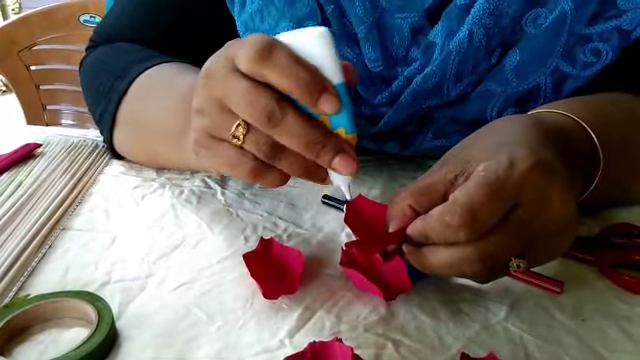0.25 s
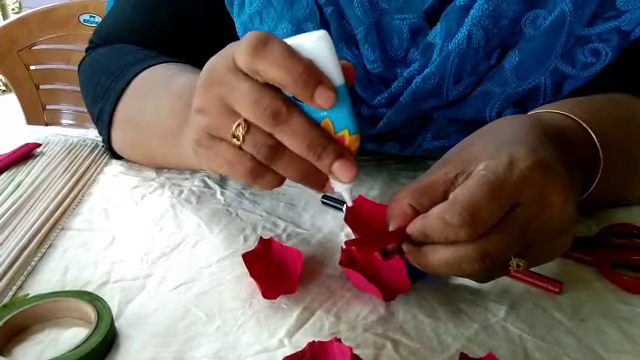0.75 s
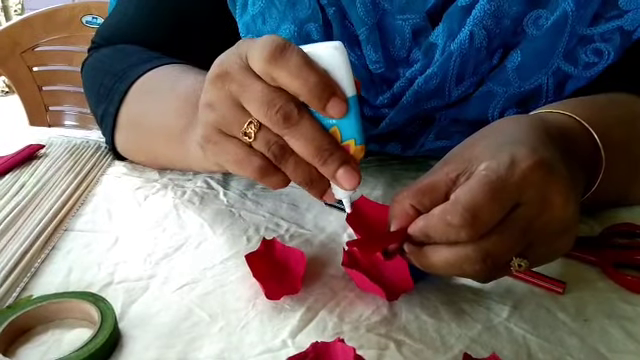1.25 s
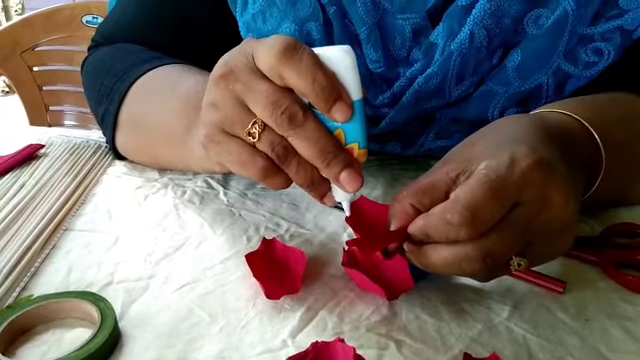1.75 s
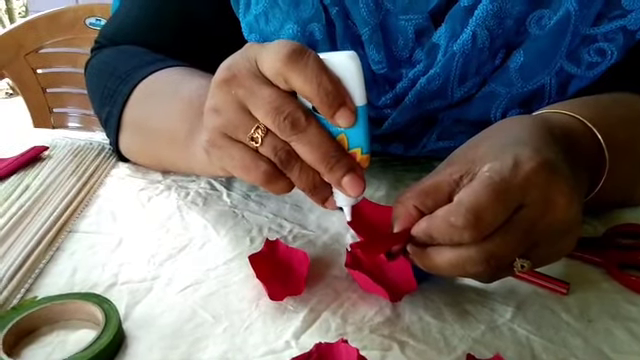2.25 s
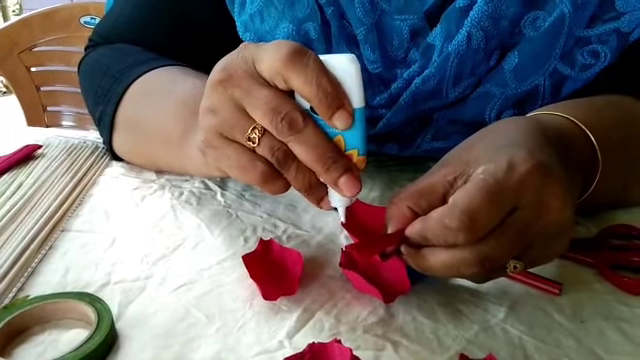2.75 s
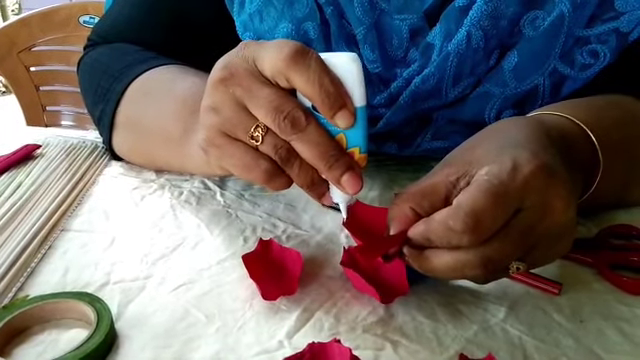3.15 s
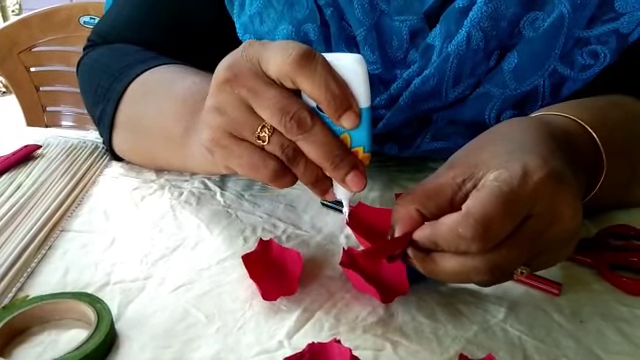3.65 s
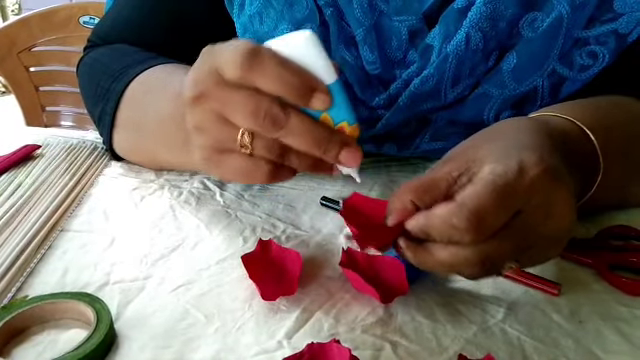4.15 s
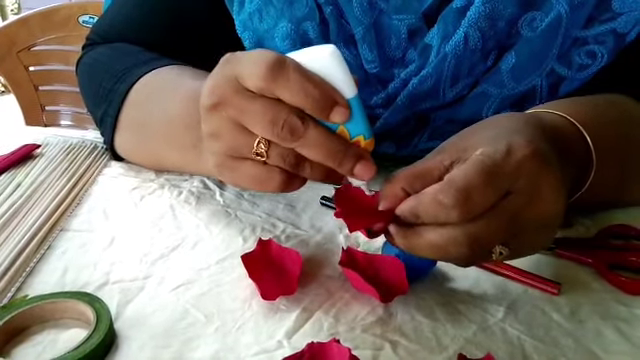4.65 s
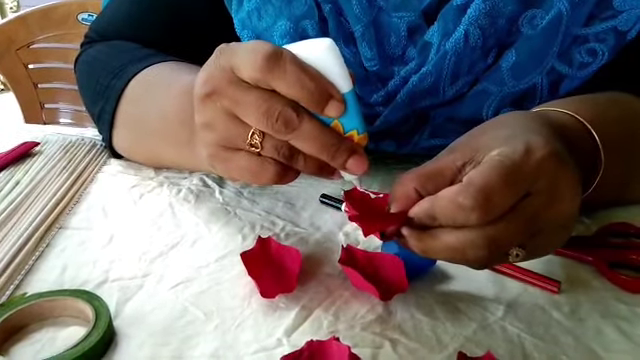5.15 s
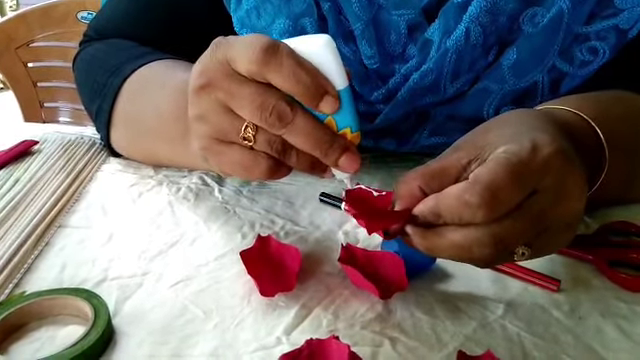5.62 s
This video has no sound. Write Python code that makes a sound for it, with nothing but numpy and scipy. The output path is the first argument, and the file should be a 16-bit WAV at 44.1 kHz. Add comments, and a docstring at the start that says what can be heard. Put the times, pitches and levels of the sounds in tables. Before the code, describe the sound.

Close, dry snaps of a squeeze bottle and petals at a table stand out over a constant motor hum and trilling crickets. Strong clicks come early, with a soft papery hiss, then isolated ones near 1.6 and 2.3 seconds. Distant engines rumble faintly, a weak squeal appears after three seconds, and the microphone carries a fine electrical buzz and high whine.

```python
"""A fan's mains hum and crickets outside sound throughout, over far traffic, from a quiet room.
Close by, at a table, a plastic glue bottle and paper petals click in the hands; one petal rustles.
Far off, faint tones and a squeal come and go; the camera adds a thin buzz of ticks and a high whine.
Hum, whine and chirps are summed sines; air, rumble and rustle are shaped noise; snaps and ticks are
short bursts sent through clicks of a given spectrum. All of it meets at one microphone."""
import sys
import numpy as np
from scipy import signal
from scipy.fft import rfft, irfft
from scipy.io import wavfile

SR = 44100
rng = np.random.default_rng(int(sys.argv[2]) if len(sys.argv) > 2 else 0)


def wav_record(signal):
    """Record a signal, one row per channel, as 16-bit PCM in the file named by sys.argv[1]."""
    frames = np.transpose(np.atleast_2d(signal))
    bounded = np.clip(frames, -1, 1)
    # unit amplitude maps onto the largest positive 16-bit level
    quanta = np.round(bounded * 32767).astype(np.int16)
    wavfile.write(sys.argv[1], SR, quanta)


N = 259308
TIME = np.arange(N) / SR

# Still air of the room: (frequency [Hz], density [dB per Hz])
AIR_SPECTRUM = [(20, -99), (90, -82), (520, -80), (610, -84), (1050, -85.5), (1500, -91), (2100, -97.5),
                (2900, -95.5), (4400, -105), (9100, -100.5), (10400, -88.5), (11400, -100), (12400, -109),
                (15500, -115)]

# Fan motor lines: (multiple of the mains [1], level [dB rms])
FAN_LINES = [(1, -62.5), (3, -46.5), (3.5, -62), (4, -55), (4.5, -53.5), (5, -59), (5.5, -79), (6, -72),
             (7, -65), (7.5, -65.5), (8, -50), (9, -57.5), (10, -54.5), (11, -54), (13, -60), (14, -68),
             (15, -63), (16, -67.5), (17, -59.5), (18, -57), (19, -58), (21, -66.5), (36, -77), (40, -79)]
MAINS_HZ = 49.864

# Far traffic, colour of the rumble: (frequency [Hz], relative density [dB per Hz])
RUMBLE_SPECTRUM = [(15, -42), (26, -22), (33, -8.5), (52, -2.5), (66, -0.5), (85, -14.5), (130, -17.5),
                   (300, -80)]
# One far engine passes at a steady pitch: level when nearest, time when nearest, how long it stays near
PASS_HZ, PASS_DB, NEAREST_S, NEAR_S = 53, -50.5, 2.54, 0.61
# Another pulls away: it comes in, gathers speed and throbs slowly
PULL_START_S, PULL_DB, PULL_FROM_HZ, PULL_TO_HZ, SPEED_UP_S, FADE_IN_S = 1.6, -53, 59, 69.4, .9, .25
THROB_S, THROB_PEAK_S, THROB_DEPTH = 0.95, 2.78, 0.4

# Nearest cricket, phrases: (start [s], first pitch [Hz], relative level [dB], chirps [count])
NEAR_PHRASES = [(-.14, 2782, -51.5, 3), (.36, 2790, -54.5, 3), (.87, 2792, -53.5, 3),
                (1.37, 2795, -52.5, 3), (1.86, 2798, -50.5, 2), (2.28, 2803, -52, 2),
                (2.74, 2806, -51.5, 3), (3.27, 2798, -51, 3), (3.8, 2799, -53.5, 3), (4.29, 2796, -54.5, 3),
                (4.81, 2794, -53, 3), (5.32, 2796, -56.5, 3), (5.8, 2801, -56.5, 3)]
# Its wing tone, harmonics 1-5: (level [dB])
NEAR_WING_DB = [-8.5, -19, -18, -0.35, -39]
# Within a phrase each chirp is lower than the one before, later ones are longer, and the first is soft
STEP_HZ, FIRST_S, LONGER_S, REST_S, FIRST_DB = 25.75, .125, .03, .015, -2

# Farther crickets: (pitch [Hz], relative level [dB])
FAR_CRICKETS = [(2575, -66), (2605, -61), (2625, -58.5), (2640, -57.5), (2655, -58), (2672, -58),
                (2690, -57.5), (2708, -58), (2730, -59), (2765, -63), (2835, -68)]
# Their wing tone, harmonics 1-5: (level [dB])
FAR_WING_DB = [-6.5, -20.5, -18.5, -2, -41]

# Colour of the camera's ticks: (frequency [Hz], relative level [dB])
TICK_COLOUR = [(300, -22), (1500, -13), (2500, 2), (4000, -7.5), (7000, 0), (9000, 3.5), (11000, 3.5),
               (12500, -11), (15500, -52)]
TICKS_PER_S, TICK_PHASE_TURNS = 59.931, .825

# Snaps of bottle and petals, close to the microphone:
# (time [s], level over 5 ms [dB rms], ring [Hz], ring boost [dB], low knock boost [dB])
HAND_SNAPS = [(0.0267, -46, 9450, 8, -1), (0.0593, -46.5, 9500, 0.5, -4), (.08, -54, 2050, 23, 2),
              (0.2137, -26, 9600, 5.5, 0), (0.3791, -43, 2650, 20, 7), (0.4084, -49, 8000, 0, 12),
              (0.413, -42.5, 9200, 7, 1), (.4566, -24, 8920, 21, 19.5), (0.4837, -46.5, 3380, 19, 9),
              (0.4912, -44, 8000, 7, 20), (.5218, -49, 7500, 4, 8), (.5323, -45.5, 9000, 0, 14),
              (0.8312, -47, 7000, 6, 9), (1.333, -50, 7000, 4, 18), (1.4336, -53, 9000, -2, 6),
              (1.4996, -39, 8850, 9, -17), (1.565, -51, 1840, 46, 2), (1.6233, -28, 5370, 7.5, 3),
              (2.0296, -48, 6500, 10, -8), (2.2775, -32, 9100, 14, 10)]
# Colour of every snap before its ring and knock: (frequency [Hz], relative level [dB])
SNAP_COLOUR = [(200, -25), (1200, -19), (2400, -13), (3800, -7.5), (5700, -0.5), (9200, 1.5), (11000, -0.5),
               (12000, -5), (13200, -13), (14500, -21)]

# A petal sliding between the fingers: (frequency [Hz], density before the stroke [dB per Hz])
RUSTLE_SPECTRUM = [(1000, -115), (3000, -100), (5000, -101), (8500, -93), (11000, -103), (13000, -103),
                   (15000, -112)]
# The stroke of that petal: (time [s], gain [dB])
PETAL_STROKE = [(.3, -40), (.36, 1), (.42, -1), (.5, 2), (.54, -14), (.58, -40)]

# Faint far tones: (start [s], end [s], pitch [Hz], width [Hz], level before fades [dB rms])
DISTANT_TONES = [(1.75, 2.4, 1080, 50, -63), (2.85, 3.62, 872, 14, -55.5), (3.2, 3.8, 1150, 70, -64.5),
                 (4.1, 4.22, 660, 70, -55.5), (5.62, 5.78, 805, 10, -51), (5.76, 5.97, 803, 10, -51.5)]
# A far squeal, perhaps of brakes: (start [s], end [s], level [dB])
FAR_SQUEALS = [(3.354, 3.8, -67.5), (3.861, 4.313, -61.5)]
# The two tones of the squeal: (pitch [Hz], level added to the squeal's [dB])
SQUEAL_PAIR = [(2915, 2.5), (3335, -4)]
SQUEAL_WIDTH_HZ = 30

BAND_EDGE_HZ = 15520


def gain_of(db):
    """Decibels to amplitude."""
    return 10 ** (np.asarray(db) / 20)


def evened(x):
    """Scaled to rms 1."""
    return x / np.sqrt(np.mean(x ** 2) + 1e-30)


def read(points, hz):
    """A spectrum's value at hz, on a log-frequency axis."""
    f, value = np.transpose(points)
    return np.interp(np.log(hz + 1), np.log(f + 1), value)


def add(mix, start_s, sound):
    """Mixes a sound in at start_s, cropped to the length of the mix."""
    at = round(start_s * SR)
    sound = sound[max(-at, 0):]
    part = mix[max(at, 0):][:len(sound)]
    part += sound[:len(part)]


def sine(turns):
    """A sine of amplitude 1 from its phase in turns."""
    return np.sin(2 * np.pi * turns)


def noise(points):
    """Noise with the given density in dB per Hz."""
    hz = np.fft.rfftfreq(N, 1 / SR)
    white = rfft(rng.standard_normal(N))
    return irfft(white * gain_of(read(points, hz)), N) * np.sqrt(SR / 2)


def drift(rate, size=N):
    """Smooth chance of about rms 1: straight lines between random knots, rate knots a second."""
    knots = rng.standard_normal(4096)
    return np.interp(np.arange(size) / SR * rate, np.arange(len(knots)), knots) * np.sqrt(3 / 2)


def impulse(colour_db):
    """The shortest causal (minimum-phase) click that has the given spectrum."""
    log_gain = np.log(gain_of(np.r_[colour_db, colour_db[-2:0:-1]]))
    return np.fft.ifft(np.exp(np.conj(signal.hilbert(log_gain)))).real


def echoes(x, t60):
    """Diffuse reflections of energy 1, from 3 ms on, falling 60 dB in t60 seconds."""
    t = np.arange(SR // 2) / SR
    tail = rng.standard_normal(len(t)) * gain_of(-60 * t / t60) * (t > .003)
    return signal.fftconvolve(x, tail / np.linalg.norm(tail))[:N]


def still_air():
    """The quiet room itself: steady noise with a fixed spectrum."""
    return noise(AIR_SPECTRUM)


def fan(waver=0.034, buzz_db=-80, buzz_fall_db=-7, uneven_db=4):
    """Strong motor lines locked to the mains, with a faint uneven buzz of upper harmonics."""
    turns = MAINS_HZ * TIME
    upper = np.arange(20, 46)
    fall_db = buzz_fall_db * np.log2(upper / upper.mean())
    upper_db = buzz_db + fall_db + uneven_db * rng.uniform(-2.6, 1, len(upper))
    out = np.zeros(N)
    for multiple, db in FAN_LINES:
        out += gain_of(db) * (1 + waver * drift(6.1)) * sine(multiple * turns + rng.random())
    for multiple, db in zip(upper, upper_db):
        out += gain_of(db) * sine(multiple * turns + rng.random())
    return np.sqrt(2) * out


def traffic(rumble_db=-57.0, rise_db=4, swell_db=1.5, swells_per_s=6):
    """A low far rumble that swells as one engine passes, while another pulls away with rising pitch."""
    near = 1 / np.hypot(1, (TIME - NEAREST_S) / NEAR_S)  # inverse distance, 1 when nearest
    rumble_level_db = rumble_db + rise_db * near + swell_db * drift(swells_per_s)
    rumble = evened(noise(RUMBLE_SPECTRUM)) * gain_of(rumble_level_db)
    passing = gain_of(PASS_DB) * near * sine(PASS_HZ * TIME + rng.random())

    age = np.maximum(TIME - PULL_START_S, 0)
    hz = PULL_TO_HZ + (PULL_FROM_HZ - PULL_TO_HZ) * np.exp(-age / SPEED_UP_S)
    throb = 1 + THROB_DEPTH * np.cos(2 * np.pi * (TIME - THROB_PEAK_S) / THROB_S)
    level = gain_of(PULL_DB) * (1 - np.exp(-age / FADE_IN_S)) * throb
    pulling = level * sine(np.cumsum(hz) / SR + rng.random())
    return rumble + np.sqrt(2) * (passing + pulling)


def chirp(length_s, hz, wing_db, sag, jitter):
    """One wing stroke: a tone with harmonics that sags as the stroke slows."""
    u = np.linspace(-.5, .5, max(round(length_s * SR), 2))
    turns = np.cumsum(hz * (1 - sag * u + jitter * drift(300.7, len(u)))) / SR
    tone = sum(gain_of(db) * sine(k * turns) for k, db in enumerate(wing_db, 1))
    return np.sqrt(2) * tone * signal.windows.tukey(len(u), .35)


def near_cricket(sag=0.0056, jitter=0.00061, uneven_db=1.07, dry_db=-1, wet_db=-8):
    """The nearest cricket: falling phrases of clear chirps, with some reflections around them."""
    out = np.zeros(N)
    for (start, hz, db, chirps), following in zip(NEAR_PHRASES, NEAR_PHRASES[1:] + [None]):
        for k, loud in enumerate(rng.standard_normal(chirps)):
            length = FIRST_S + k * LONGER_S
            if following and k == chirps - 1:  # the last chirp lasts until the next phrase
                length = following[0] - REST_S - start
            gain = gain_of(db + FIRST_DB * (k == 0) + uneven_db * loud)
            add(out, start, gain * chirp(length, hz - k * STEP_HZ, NEAR_WING_DB, sag, jitter))
            start = start + length + REST_S
    return gain_of(dry_db) * out + gain_of(wet_db) * echoes(out, t60=0.7)


def chorus(stroke_s=.17, step=.009, sag=0.00754, jitter=0.0043, uneven_db=2.0):
    """Each farther cricket repeats a falling phrase of three at its own pace, blurred by echoes."""
    out = np.zeros(N)
    for hz, db in FAR_CRICKETS:
        lead_s = rng.uniform(.2, .7)
        pace_s = stroke_s * rng.uniform(.88, 1.12)
        for k, (late, loud, detune) in enumerate(rng.standard_normal((48, 3))):
            pitch = hz * (1 + step * (1 - k % 3) + .002 * detune)
            stroke = chirp(0.921 * pace_s, pitch, FAR_WING_DB, sag, jitter)
            add(out, k * pace_s - lead_s + .015 * late, gain_of(db + uneven_db * loud) * stroke)
    return 0.5 * out + 0.7 * echoes(out, t60=0.34)


def bush_cricket(hz=9385, level_db=-71.0, pulses_per_s=12.785, sweep_hz=220, scatter_hz=45):
    """A thin, high, evenly pulsing trill; each pulse slides down in pitch."""
    turns = pulses_per_s * (TIME - .04)
    slide = (turns + .5) % 1 - .5  # -0.5 to 0.5 through each pulse
    pitch = hz - sweep_hz * slide + scatter_hz * drift(400)
    pulses = np.cos(np.pi * turns) ** 10
    return gain_of(level_db) * evened(pulses * sine(np.cumsum(pitch) / SR))


def camera_buzz(ticks_db=-62, burst_s=0.0018, whine_hz=13967, whine_db=-81):
    """Electrical pickup: bursts, part alike and part hiss, tick about 60 times a second under a whine."""
    train = np.diff(np.floor(TICKS_PER_S * TIME - TICK_PHASE_TURNS), prepend=-1)
    t = np.arange(-128, 129) / SR
    gate = np.exp(-(t / burst_s) ** 2)
    alike = signal.fftconvolve(train, gate * rng.standard_normal(len(t)), "same")
    hiss = signal.fftconvolve(train, gate, "same") * rng.standard_normal(N)
    colour = impulse(read(TICK_COLOUR, np.fft.rfftfreq(1024, 1 / SR)))
    ticks = signal.fftconvolve(hiss + 0.78 * alike, colour)[:N]
    whine = sine(np.cumsum(whine_hz + 12 * drift(44)) / SR)
    return gain_of(ticks_db) * evened(ticks) + gain_of(whine_db) * evened(whine)


def handling(ring_width_hz=750, knock_hz=2750, knock_width_hz=950,
             bounce=0.083, bounce_s=.00057, crackle=0.17, crackle_s=0.00079, room_db=-19):
    """Each snap rings briefly, crackles for about a millisecond and bounces off the table top."""
    out = np.zeros(N)
    hz = np.fft.rfftfreq(1024, 1 / SR)
    t = np.arange(512) / SR
    for start, db, ring_hz, ring_db, knock_db in HAND_SNAPS:
        width = ring_width_hz * np.sqrt(ring_hz / (SR / 5))  # low rings last longer
        peak = 1 / (1 + ((hz - ring_hz) / width) ** 2)
        ring = 20 * np.log10(1 + (gain_of(ring_db) - 1) * peak)
        knock = knock_db / (1 + ((hz - knock_hz) / knock_width_hz) ** 2)
        force = crackle * rng.standard_normal(len(t)) * np.exp(-t / crackle_s)
        force[0] += 1
        add(force, bounce_s, np.array([bounce]))
        snap = np.convolve(force, impulse(read(SNAP_COLOUR, hz) + ring + knock))
        to_rms_1 = np.sqrt(.005 * SR / np.sum(snap ** 2))  # its energy spread over 5 ms
        add(out, start, gain_of(db) * snap * to_rms_1)
    return out + gain_of(room_db) * echoes(out, t60=0.11)


def rustle():
    """Paper drags over skin: a short hiss that catches in tiny grains."""
    time_s, db = np.transpose(PETAL_STROKE)
    grain = evened(gain_of(5.9 * drift(500)))
    return noise(RUSTLE_SPECTRUM) * grain * gain_of(np.interp(TIME, time_s, db))


def far_tones():
    """Tones and squeals, smeared in pitch and level by distance, swell and fade."""
    out = np.zeros(N)
    squeals = [(start, end, hz, SQUEAL_WIDTH_HZ, db + tone_db)
               for start, end, db in FAR_SQUEALS for hz, tone_db in SQUEAL_PAIR]
    for start, end, hz, width, db in DISTANT_TONES + squeals:
        t = np.arange(0, end - start, 1 / SR)
        smear = drift(2 * width, len(t)) + 1j * drift(2 * width, len(t))
        tone = evened((smear * np.exp(2j * np.pi * hz * t)).real)
        add(out, start, gain_of(db) * tone * signal.windows.tukey(len(t), .5))
    return out


def scene():
    """Room, outdoors and hands at one microphone."""
    room = still_air() + fan()
    outdoors = traffic() + near_cricket() + chorus() + bush_cricket() + far_tones()
    close = camera_buzz() + handling() + rustle()
    return (room + outdoors + close)[None]


def record(dry):
    """The recorder's band limit: a linear-phase low-pass."""
    low_pass = signal.firwin(511, BAND_EDGE_HZ, window=("kaiser", 9), fs=SR)
    return signal.oaconvolve(dry, low_pass[None], "same")


dry = scene()
out = record(dry)
wav_record(out)
```